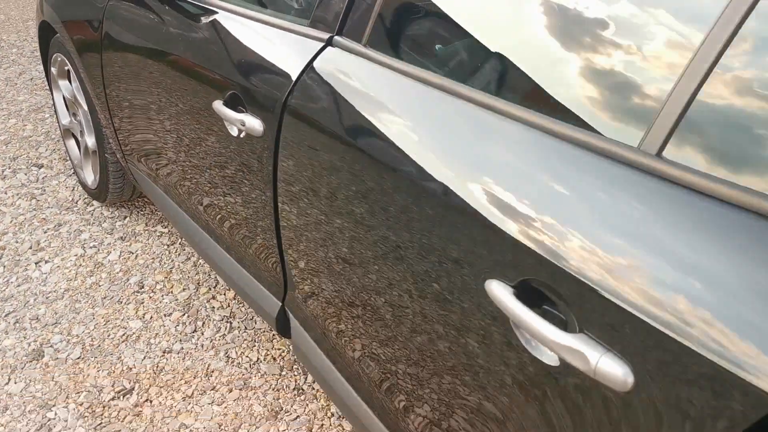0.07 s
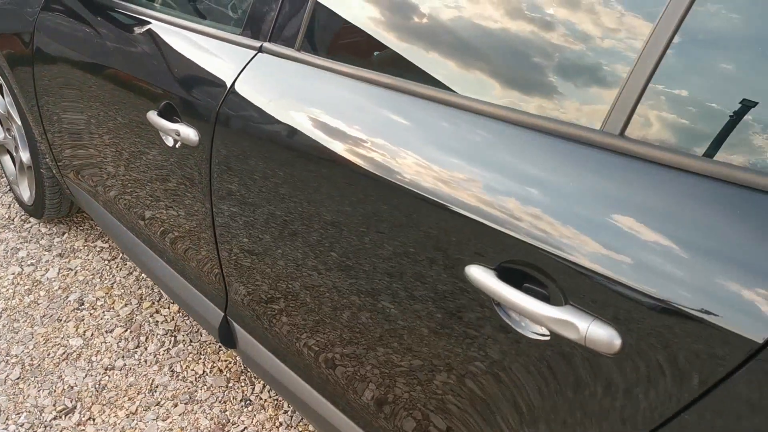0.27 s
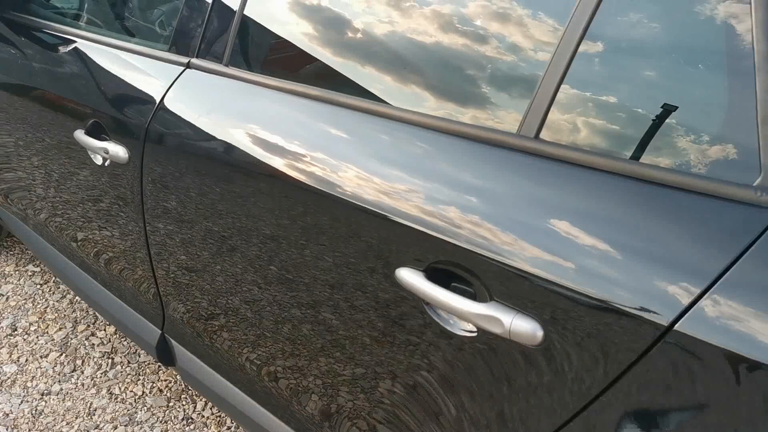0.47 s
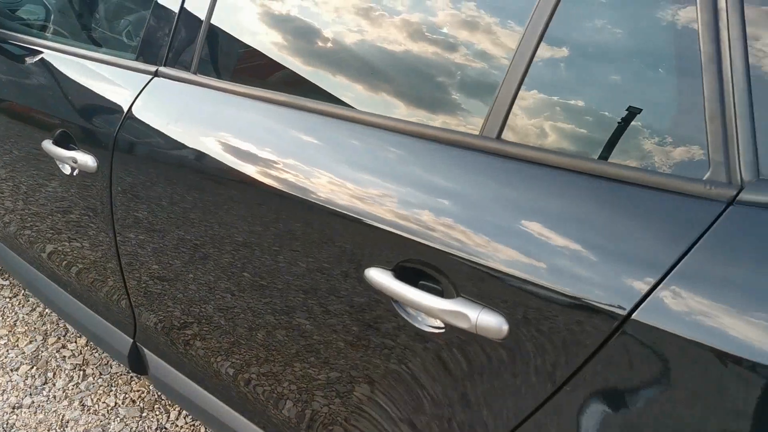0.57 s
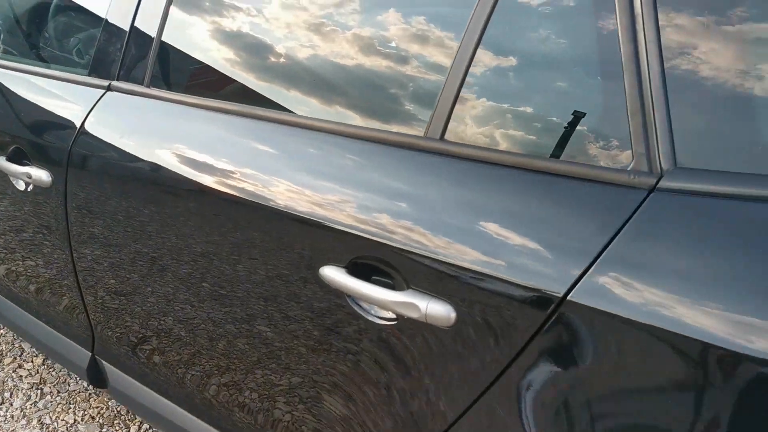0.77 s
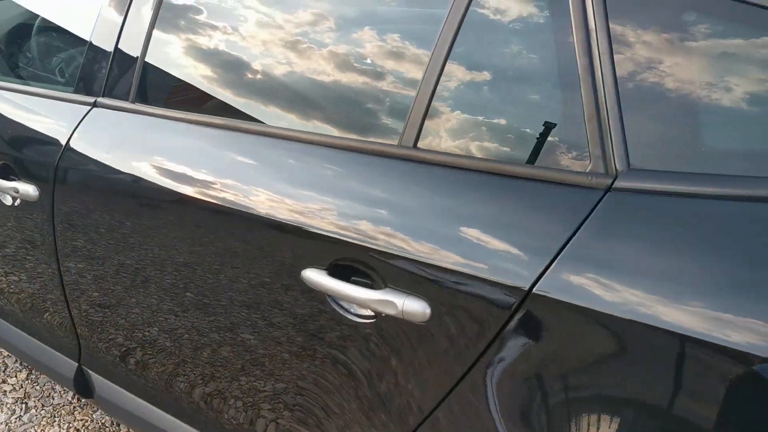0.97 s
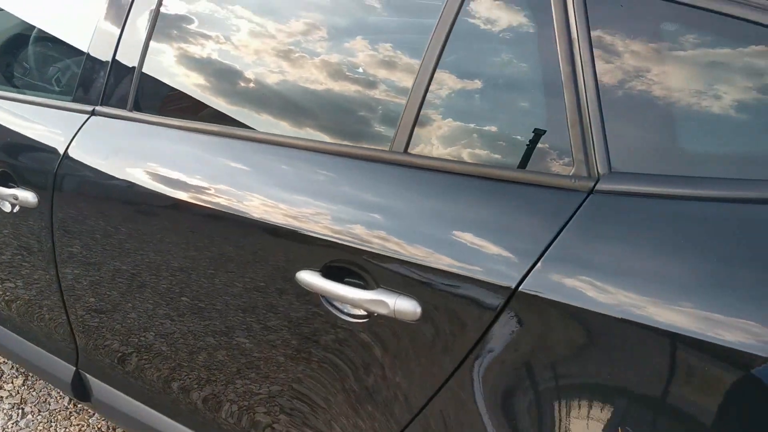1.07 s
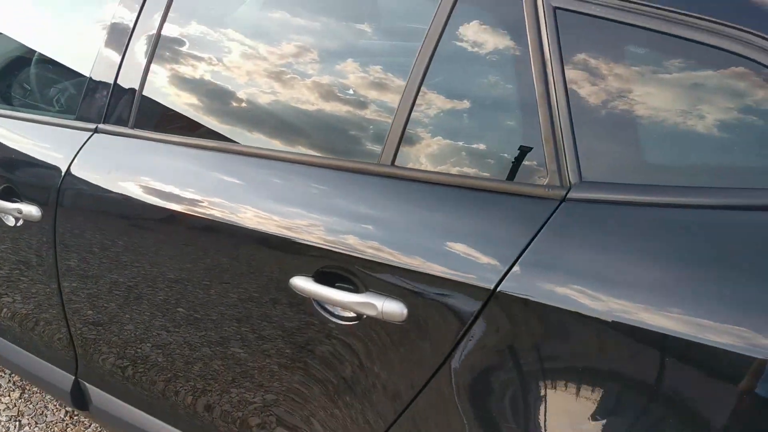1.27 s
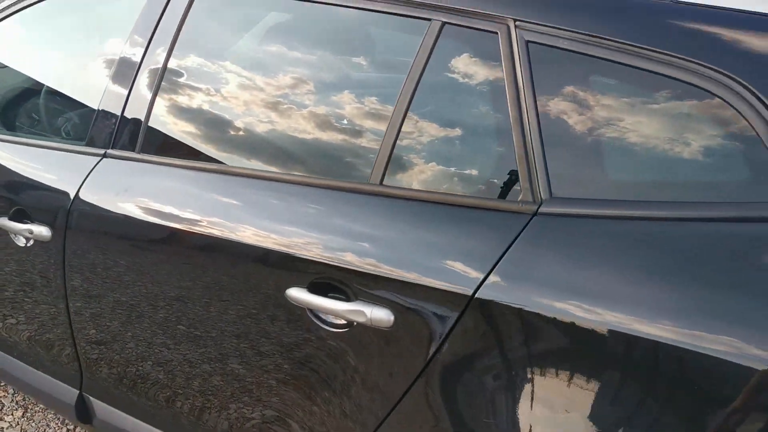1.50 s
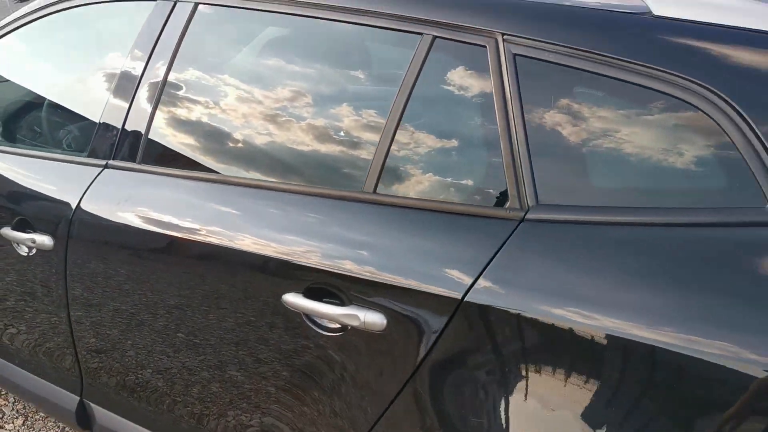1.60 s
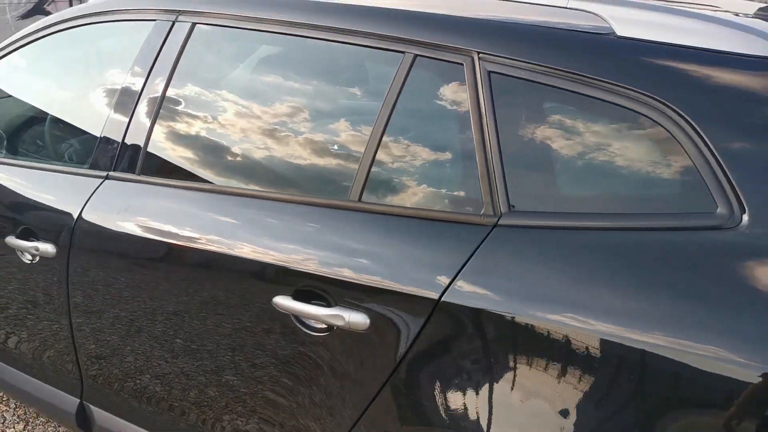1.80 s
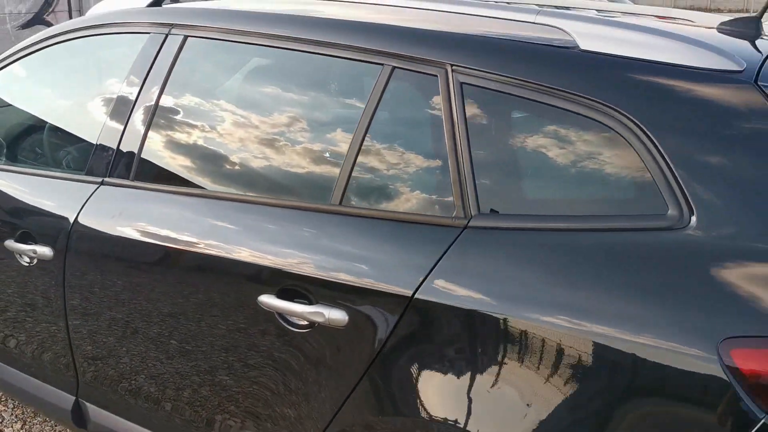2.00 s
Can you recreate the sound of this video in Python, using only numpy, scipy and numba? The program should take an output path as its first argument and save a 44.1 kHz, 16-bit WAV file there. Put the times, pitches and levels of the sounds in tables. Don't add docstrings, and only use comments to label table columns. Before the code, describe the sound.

Close, loud car door closing outdoors, metallic latch first, then a deep hollow thud and short metal ring; afterwards faint wind rumble, a far motor whine, tiny clicks and gravel scuffs, heard by a handheld stereo phone.

```python
import sys
import numpy as np
from scipy import signal
from scipy.io import wavfile
from scipy.ndimage import uniform_filter1d
from numba import njit

SR = 44100
rng = np.random.default_rng(int(sys.argv[2]) if len(sys.argv) > 2 else 0)


def store_wav(level_fs):
    pcm = np.round(np.clip(np.atleast_2d(level_fs), -1, 1) * 32767)
    wavfile.write(sys.argv[1], SR, pcm.T.astype(np.int16))


def makeup_ratio(level_db):
    decades = np.asarray(level_db, float) / 20
    return 10 ** decades


N = 90404
T = np.arange(N) / SR
LR = np.array([[1], [-1]])


@njit
def svf(x, hz, width):
    y, b, l = np.empty(len(x)), 0., 0.
    g, k = np.tan(np.pi * hz / SR), width / hz
    for i in range(len(x)):
        v = (b + g * (x[i] - l)) / (1 + g * (g + k))
        b, l, y[i] = 2 * v - b, l + 2 * g * v, k * v
    return y


def unit(x):
    return x / np.sqrt(np.mean(x ** 2))


def noise():
    return rng.standard_normal(N)


def walk(rate):
    k = int(SR / rate)
    steps = np.repeat(rng.standard_normal(N // k + 1), k)
    return 1.3 * uniform_filter1d(uniform_filter1d(steps, k), k)[:N]


def at(table, hz, axis):
    table = np.array(table)
    return np.interp(np.log(hz), np.log(table[:, 0]), table[:, axis])


def over_time(table, axis=1):
    table = np.array(table)
    return np.interp(T, table[:, 0], table[:, axis])


def push(s, db, ms):
    u = np.clip((T - s) * 1000 / ms, 0, 1)
    return makeup_ratio(db) * np.sin(np.pi * u) * np.pi / 2 * 1000 / (ms * SR)


def ring(force, hz, t60):
    p = np.exp(2j * np.pi * hz / SR - np.log(1000) / (t60 * SR))
    return signal.lfilter([1], [1, -p], force).imag


def struck(force, modes):
    out = sum(makeup_ratio(db + LR * pan / 2) * ring(force, hz, t60) for hz, db, t60, pan in modes)
    lag_s = 0.00025
    return np.array([np.roll(out[0], int(lag_s * SR)), out[1]])


# [f/Hz, left minus right/dB]
PORTS = [(60, 2), (110, 0.5), (200, 1), (380, -1), (700, -7), (1290, 1.5), (2380, -8), (4400, 2),
         (8120, 4.5), (15000, -17)]


def pair(hz, width, likeness):
    c = np.clip(at(likeness, hz, axis=1), -.97, .97)
    wide = width / np.sinc(2 * hz / SR)
    mid, side = (unit(svf(svf(noise(), hz, wide), hz, wide)) for _ in range(2))
    both = (np.sqrt(1 + c) * mid + np.sqrt(1 - c) * side * LR) / np.sqrt(2)
    return both * makeup_ratio(LR * at(PORTS, hz, axis=1) / 2)


# [f/Hz, level/dB per Hz]
TOWN = [(20, 0.5), (65, -12), (90, -1.5), (200, -7), (390, -18.5), (450, -25), (650, -21.5), (1000, -30.5)]
# [f/Hz, level/dB per Hz]
HISS = [(1050, -31), (1300, -28), (2000, -29), (2550, -33), (3000, -42), (6900, -47), (7900, -60),
        (10000, -58), (15700, -63)]
# [t/s, drone level/dB, tyre hiss level/dB]
TRAFFIC = [(0, -3.5, -4), (.2, 0, -21), (.5, 1.5, -4), (.75, 0.5, -1.5), (1.1, -1, 0.5), (1.25, -2, -1.5),
           (1.45, 1, 1), (1.7, 0, .5), (2.05, 0, 0.5)]
# [f/Hz, correlation]
LIKENESS = [(60, 1), (130, 0.7), (290, 0.89), (640, -0.65), (1410, 0.28), (3100, -0.19), (6820, -0.025),
            (15000, 0.72)]


def traffic():
    out, swell = 0, walk(1.66)
    drone, tyres = over_time(TRAFFIC, 1), over_time(TRAFFIC, 2)
    for hz in 24 * 2 ** np.arange(0, 9.3, 1 / 4):
        flow = drone * (hz < 500) + tyres * (hz > 2700)
        flicker = .5 * swell + walk(6.62)
        db = at(TOWN + HISS, hz, axis=1) + 10 * np.log10(hz) + flow + flicker
        out = out + makeup_ratio(db) * pair(hz, hz / 4, LIKENESS)
    return makeup_ratio(-39.5) * unit(out)


# [t/s, level/dB, f/Hz]
RUMBLE = [(0, -46.5, 132.2), (.55, -45, 99.96), (0.85, -43, 100.3), (1.099, -51, 169.1), (1.319, -39, 135),
          (1.499, -53, 123.2), (1.651, -41.5, 130.4), (1.82, -60.5, 190.6), (1.92, -49.5, 192.4),
          (1.985, -37, 199.8), (2.05, -50.5, 196.5)]


def rumble():
    turns = np.cumsum(over_time(RUMBLE, 2) * (1 + 0.024 * walk(30.27))) / SR
    level = makeup_ratio(over_time(RUMBLE) + 2 * walk(25.3) + LR / 2)
    return np.sqrt(2) * level * np.sin(2 * np.pi * turns)


# [t/s, f/Hz, level/dB]
MOTOR = [
    (0, 640, -54.5),
    (.55, 643.8, -64.5),
    (0.702, 643, -57.5),
    (0.949, 645.7, -56.5),
    (1.12, 649, -68),
    (1.25, 653.6, -55),
    (1.5, 657.6, -56.5),
    (1.699, 662.6, -59),
    (1.9, 671.3, -54.5),
    (2.05, 664, -61),
]
# [multiple of f, level/dB]
MOTOR_ORDERS = [
    (1, 3.5),
    (2, 2),
    (3, -11.5),
]


def motor():
    phase = 2 * np.pi * np.cumsum(over_time(MOTOR, 1) * (1 + 0.00695 * walk(44.88))) / SR
    lines = sum(makeup_ratio(db + 3.0 * walk(22) - 2.5 - 3 * LR / 2) * np.sin(k * (phase + .9 * LR))
                for k, db in MOTOR_ORDERS)
    return np.sqrt(2) * makeup_ratio(over_time(MOTOR, 2)) * lines


# [t/s, level/dB]
GUSTS = [(0, -41), (.12, -41), (.22, -38.5), (.45, -48.5), (.56, -46), (.68, -49), (.75, -44), (.82, -54),
         (.88, -45.5), (1.0, -53), (1.12, -59), (1.25, -52.5), (1.33, -47), (1.43, -49), (1.52, -43.5),
         (1.65, -48.5), (1.78, -50), (1.9, -59), (2.0, -44.5)]


def wind():
    wind_hz, width_hz = 51.4, 26.7
    gusts = np.array([makeup_ratio(2.0 * walk(9.7)) * unit(svf(noise(), wind_hz, width_hz)) for _ in range(2)])
    return makeup_ratio(over_time(GUSTS)) * (gusts + 0.62 * gusts[::-1]) * np.array([[.9], [.7]])


# [t/s, level/dB, f/Hz, ring/ms]
TICKS = [(.735, -61, 7000, 8), (.802, -46, 1900, 10), (.838, -41, 800, 12), (.882, -61, 11000, 8),
         (1.178, -51, 1950, 30), (1.405, -59, 3050, 90), (1.406, -60, 3650, 90), (1.414, -62, 3000, 110),
         (1.428, -63, 3500, 90), (1.465, -50, 500, 20), (1.483, -48, 900, 12), (1.6701, -35.5, 1160, 22),
         (1.6722, -47, 1160, 16)]
TICK_SPREAD = [
    (.77, .9),
    (1, 1),
    (1.33, .75),
]


def ticks():
    out = 0
    for s, db, hz, ms in TICKS:
        tap, spread = push(s, 0, 0.076), min((1300 / hz) ** 3, 1)
        out = out + makeup_ratio(db) * sum(g * ring(tap, hz * r ** spread, ms / 1000) for r, g in TICK_SPREAD)
    return -out * makeup_ratio(-1.5 * LR / 2)


# [t/s, length/s, level/dB]
SCUFFS = [
    (1.42, .05, -72),
    (1.469, .012, -63),
    (1.489, .05, -65.5),
    (1.672, 0.011, -57),
    (1.75, .014, -59),
    (1.777, 0.027, -67),
    (2.02, 0.0081, -70),
]


def scuffs():
    shape = sum(makeup_ratio(db) * np.exp(-((T - s) / (length / 2)) ** 2) for s, length, db in SCUFFS)
    grit = [unit(svf(svf(noise() * makeup_ratio(3 * walk(500)), 3500., 4000.), 3500., 14000.)) for _ in range(2)]
    return shape * np.array(grit) * makeup_ratio(3 * LR / 2)


# [f/Hz, width/Hz, level/dB]
SWISH = [
    (780, 1040, -49),
    (4600, 490, -71),
    (6650, 750, -77.5),
    (11000, 2300, -85),
]


def swish():
    let_go_s, fade_s = 0.232, 0.027
    fade = np.clip((let_go_s - T) / fade_s, 0, 1) * makeup_ratio(2 * walk(42.4))
    cloth = sum(makeup_ratio(db) * pair(1. * hz, 1. * width, LIKENESS) for hz, width, db in SWISH)
    return fade * makeup_ratio(6 * LR / 2) * cloth


# [t/s, level/dB, width/ms]
PUFFS = [
    (.1797, -11, 1.8),
    (.1965, -19, 2.5),
    (.2035, -21, 2.5),
    (.2150, -24, 5),
    (.4120, -17, 3.5),
]


def draught():
    puffs = 0
    for s, db, ms in PUFFS:
        u = (T - s) * 1000 / ms
        puffs = puffs + makeup_ratio(db) * (1 - u ** 2) * np.exp(-u ** 2 / 2)
    return puffs * np.array([[1], [.08]])


# [t/s, level/dB, f/Hz, ring/ms]
RATTLES = [(.2305, -34, 10800, 15), (.2330, -35, 7000, 14), (.2362, -33, 6460, 16),
           (.2305, -31.5, 4730, 18), (.2465, -33, 2480, 37), (.2520, -35, 8500, 28),
           (.2530, -38, 11000, 20), (.2525, -29, 5570, 17), (.2565, -34, 9100, 25), (.2575, -24, 4600, 27),
           (.2640, -30, 2320, 59), (.2690, -38, 4110, 23), (.2700, -43, 8780, 22), (.2740, -29.5, 1583, 45),
           (.2810, -32, 2190, 50), (.2820, -40, 6200, 48), (.2880, -39, 6000, 50), (.3000, -42, 4700, 26),
           (.3100, -44, 2060, 43), (.3210, -48, 7150, 47), (.3420, -43, 2250, 35), (.3630, -53, 5450, 40),
           (.3670, -46, 2600, 23), (.3929, -48, 2020, 40), (.4020, -59, 5500, 50), (.4050, -63, 7000, 40),
           (.4438, -50, 1920, 30)]


def rattles():
    out, spread = np.zeros((2, N)), 0.048
    for s, db, hz, ms in RATTLES:
        tap = push(s, db, 0.057)
        low, high = (ring(tap, hz * (1 + k * spread / 2), ms / 1000) for k in (-1, 1))
        out = out + np.array([low + 0.27 * high, high + 0.56 * low])
    return out


# [f/Hz, level/dB, t60/s, start t/s]
CABIN = [
    (24, -7, .5, .2400),
    (41, -16, .45, .2468),
    (51, -20, .55, .2468),
    (64, -11.5, .55, .2472),
    (73, -19, .3, .2468),
]


def cabin():
    push_ms = 4
    boom = sum(makeup_ratio(db) * ring(push(s, 0, push_ms), hz, t60) for hz, db, t60, s in CABIN)
    return boom * makeup_ratio(2 * LR / 2)


# [t/s, level/dB, contact/ms]
BLOWS = [
    (0.2469, -11.5, 1.66),
    (0.2518, -11, 2.9),
    (0.265, -30, 2.36),
    (0.281, -9.5, 4.02),
    (0.2974, -23, 3.7),
    (0.3085, -11, 3.4),
    (0.324, -16, 2.53),
    (.3480, -26.5, 2.6),
    (.3640, -27.5, 3.5),
]
# [f/Hz, level/dB, t60/s, pan/dB]
PANEL = [(135, -11, 0.07, 3), (207, -24, 0.28, -2), (249.4, -10.5, 0.5, -2.5), (278.2, -8, 0.64, 3),
         (312, -6.5, 0.35, 4.5), (367, -9, 0.12, -14), (459, -43, 0.1, -3), (512, -11.5, 0.063, 26),
         (539, -15.5, 0.26, -20), (648, -12.5, 0.48, 9), (800, -13, 0.24, 8), (1175, -9, 0.21, 23),
         (1210, -37, .2, -2), (1360, -27, .2, 3)]


def panel():
    knock_db = 28.5
    blows = sum(push(*row) for row in BLOWS)
    return struck(blows, PANEL) + makeup_ratio(knock_db) * blows


# [t/s, level/dB]
LATCH_STEPS = [
    (.2294, -9.5),
    (.2311, -11),
    (.2333, -10),
    (.2372, -22.5),
    (0.2446, -14),
    (.2477, -14),
    (.2570, -30),
    (.2690, -17.5),
    (.2810, -24),
]
# [f/Hz, level/dB, t60/s, pan/dB]
LATCH = [(295, -4, 0.05, 5), (540, -17, 0.036, -4), (720, -2.5, 0.02, -1), (858, -6.5, 0.031, -1.5),
         (1220, -8, 0.02, 13), (1650, -12, 0.049, -9), (2120, -14.5, 0.079, -19.5), (2690, -23, 0.028, -17),
         (4960, -30, .015, 4)]


def latch():
    return struck(sum(push(s, db, 0.33) for s, db in LATCH_STEPS), LATCH)


def crack_level():
    crack_db, t60_s = -11, 0.033
    return sum(makeup_ratio(db + crack_db - 60 * np.abs(T - s) / t60_s) * (T >= s) for s, db in LATCH_STEPS)


# [f/Hz, level/dB per Hz, t60/s]
SHIVER = [(100, -10, 0.74), (200, -18, 0.66), (290, -14, 0.62), (593, -23.5, 0.62), (980, -26, 0.37),
          (2500, -30, 0.26), (4900, -39, 0.27), (9000, -44, 0.16), (15000, -58, 0.21)]
# [f/Hz, correlation]
SLAM_LIKENESS = [(60, 0.87), (130, 1), (290, 1), (640, -0.044), (1410, 0.61), (3100, -0.68), (6820, 0.1),
                 (15000, 0.84)]


def shiver():
    start_s, rise_s, hold_s, treble_late_s = 0.2323, 0.016, 0.012, 0.017
    crack_top_hz = 5900
    since, cracks, out = np.maximum(T - start_s, 0), crack_level(), 0
    rise = makeup_ratio(-18.5) * np.minimum(since / rise_s, 1)
    grain = makeup_ratio(2.0 * walk(300))
    for hz in 100 * 2 ** np.arange(0, 7.4, .5):
        fall = np.maximum(since - rise_s - hold_s, 0) / at(SHIVER, hz, axis=2)
        late = np.clip(since / treble_late_s, 0, 1) ** (hz / 7000)
        shake = late * rise * grain ** min(hz / 1000, 1) * makeup_ratio(-60 * fall)
        shape = shake + cracks * min(hz / 1500, 1, (crack_top_hz / hz) ** 3)
        level = makeup_ratio(at(SHIVER, hz, axis=1) + 10 * np.log10(hz / 70))
        out = out + level * shape * pair(hz, hz / 2, SLAM_LIKENESS)
    return out


def door():
    return latch() + panel() + cabin() + shiver()


def yard(near):
    yard_db, t60_s = -19, 0.17
    t = T[:SR // 2]
    tail = rng.standard_normal((2, len(t))) * makeup_ratio(-60 * t / t60_s) * (t > .004)
    thin = signal.sosfilt(signal.butter(2, 150, "high", fs=SR, output="sos"), near)
    echoes = signal.fftconvolve(thin, tail / np.sqrt(np.sum(tail ** 2) / 2), axes=1)[:, :N]
    return makeup_ratio(yard_db) * echoes


def scene():
    far = traffic() + rumble() + motor()
    air = wind() + swish() + draught()
    near = ticks() + scuffs() + rattles() + door()
    return far + air + near + yard(near)


def roll_off(x):
    return signal.sosfilt(signal.butter(12, 15880, fs=SR, output="sos"), x)


def record(dry):
    x = signal.sosfilt(signal.butter(2, 25, "high", fs=SR, output="sos"), dry)
    rounded = 1.5 * np.tanh(x / 1.5)
    mix = signal.sosfilt(signal.ellip(8, .2, 60, 15800, fs=SR, output="sos"), rounded)
    return roll_off(mix)


dry = scene()
out = record(dry)
store_wav(out)
```